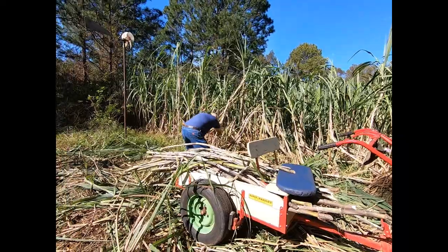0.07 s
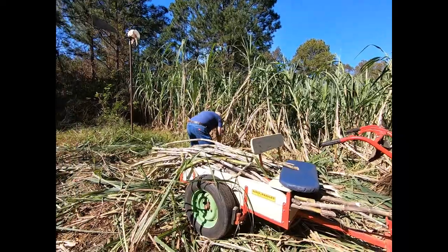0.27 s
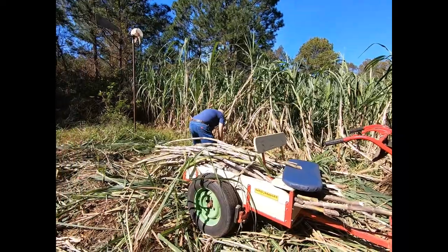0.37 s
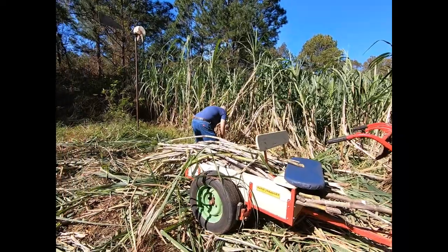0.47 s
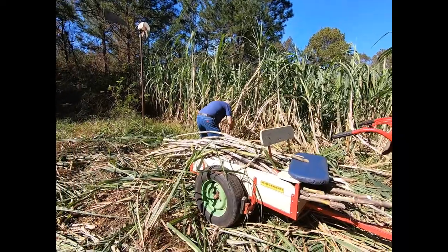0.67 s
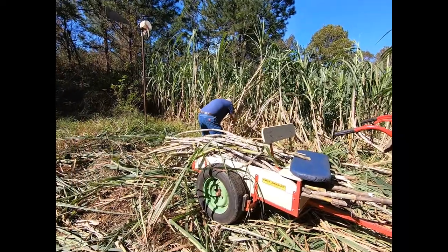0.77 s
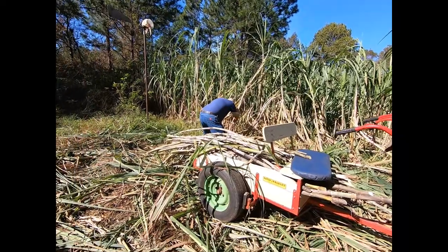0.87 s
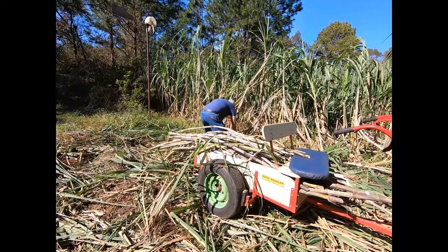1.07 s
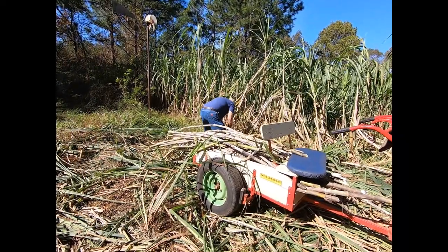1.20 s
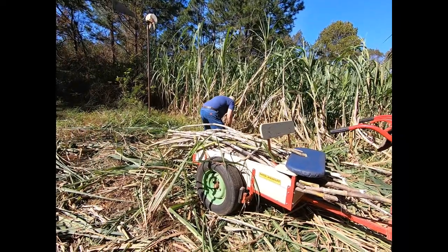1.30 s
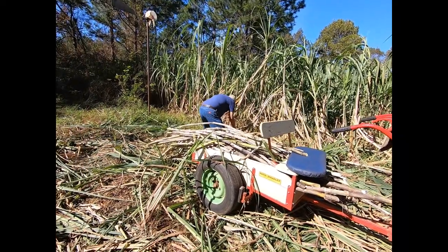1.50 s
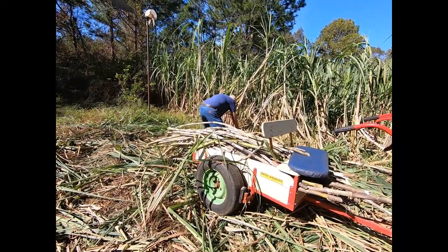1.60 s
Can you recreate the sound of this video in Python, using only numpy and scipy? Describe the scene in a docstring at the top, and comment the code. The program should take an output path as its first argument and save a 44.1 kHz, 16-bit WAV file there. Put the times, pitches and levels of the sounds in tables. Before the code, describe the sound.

Blade chops through fibrous cane stalks twice, crunch and dull thump, amid crackling dry leaves

```python
"""Chopping sugar cane

Two blade chops in an open field: each is a crunch of splitting fibres over a dull thump,
and the shaken foliage hisses on after it. Dry leaves are dragged about on the right, stalks snap,
foliage stirs, and light wind and soft bumps reach the microphone. Crunch, leaves and foliage are
many tiny random cracks; snaps and bites are short noise bursts; the thumps add decaying tones."""
import sys
import numpy as np
from scipy import signal
from scipy.fft import rfft, irfft
from scipy.io import wavfile
from scipy.ndimage import uniform_filter1d

SR = 44100
rng = np.random.default_rng(int(sys.argv[2]) if len(sys.argv) > 2 else 0)


def log_audio(samples):
    """Write samples as a 16-bit WAV file to the path given in sys.argv[1]."""
    # one column per channel
    frames = np.atleast_2d(samples).T
    # limit to full scale, then quantise
    limited = np.clip(frames, -1, 1)
    pcm = np.round(limited * 32767).astype(np.int16)
    wavfile.write(sys.argv[1], SR, pcm)


N = 72765
T = np.arange(N) / SR  # time in s
HZ = np.fft.rfftfreq(2 * N, 1 / SR)  # frequencies for filtering, with room for tails

# the two chops (blade contact t/s, peak t/s, crunch level/dB, rise/s, fall/(dB/s),
# shaken foliage level/dB, crunch tilt/(dB/octave))
CHOPS = [(0.29, 0.3035, -26.5, 0.006, 393, -41.5, 0.9), (1.176, 1.186, -33, 0.005, 403, -46, 1.1)]
# how a sound from each direction reaches the two microphones
# (f/Hz, left minus right/dB, likeness 0-1, left lead/rad)
AHEAD = [(150, -.3, .99, 0), (400, -1.2, .98, 0), (700, -2.5, .92, 0), (1400, -3, .83, .1),
         (2700, -1.2, .9, .05), (4200, .3, .88, -.2), (6200, 0, .62, -.85), (9000, -2, .4, -1.9),
         (15000, -1, .3, -2.5)]
ASIDE = [(150, -.5, .7, 0), (620, -4, .62, -.42), (1400, -8.5, .68, -.25), (2700, -7.3, .7, -.12),
         (4200, -1.2, .53, -.88), (6200, -2.5, .5, -2.8), (9000, -4.8, .33, -3.7), (15000, -2, .2, -4)]
AROUND = [(30, -3, .25, 0), (170, 0, .72, 0), (620, 0, .1, 0), (1400, -1, .15, 0), (2700, -1.5, .68, 0),
          (4200, 0, .68, -.3), (6200, 0, .4, -1.1), (9000, 0, .3, -2.5)]
FLUTTER_DB = 0.5  # how much the leaf and foliage levels waver


def amp(db):
    """Turns decibels into a gain."""
    return 10 ** (np.asarray(db) / 20)


def unit(x):
    """Scales a signal to an rms (average strength) of 1."""
    return x / np.sqrt(np.mean(x ** 2) + 1e-20)


def read(table, column=1):
    """Reads one column of a table at every frequency, joining its points over log frequency."""
    table = np.array(table, float)
    return np.interp(np.log(HZ + 1), np.log(table[:, 0] + 1), table[:, column])


def shape(x, gain):
    """Filters a signal by a gain per frequency."""
    return irfft(rfft(x, 2 * N) * gain)[..., :N]


def place(two, spectrum_db, direction):
    """Colours two unrelated signals and blends them into left and right, as sound from a direction."""
    balance_db = read(direction, 1)
    likeness = np.clip(read(direction, 2), -1, 1)
    lead = read(direction, 3)
    left, other = rfft(two, 2 * N) * amp(spectrum_db)
    right = likeness * left + np.sqrt(1 - likeness ** 2) * other
    right = right * np.exp(-1j * lead)
    pair = np.array([left * amp(balance_db / 2), right * amp(-balance_db / 2)])
    return unit(irfft(pair)[:, :N])


def crackle(per_s, spread_db, wash, patchy_db=1.5):
    """Tiny cracks at random moments over a wash of noise, with patches that favour some pitches."""
    size = amp(spread_db * np.minimum(rng.exponential(1, N), 3))
    size = size * (rng.random(N) < per_s / SR)  # keep only a few samples as cracks
    cracks = unit(size * rng.choice([-1., 1.], (2, N)))
    grains = cracks + wash * rng.standard_normal((2, N))
    # make small random areas of time and pitch louder or softer
    z = signal.stft(grains, nperseg=256, noverlap=192)[2]
    patches = uniform_filter1d(rng.standard_normal(z.shape[1:]), size=2, axis=0)
    patches = unit(uniform_filter1d(patches, size=10, axis=1))
    return signal.istft(z * amp(patchy_db * patches), nperseg=256, noverlap=192)[1][:, :N]


def flutter(hz, depth_db):
    """A gain that wavers at random, no faster than about hz, to clump the cracks."""
    slow = shape(rng.standard_normal(N), 1 / (1 + (HZ / hz) ** 4))
    return amp(depth_db * unit(slow))


def burst(start, t60, rise):
    """An envelope that rises quickly while dying away by 60 dB in every t60 seconds."""
    age = np.maximum(T - start, 0)
    attack = np.minimum(age / max(rise, 1e-5), 1)
    return attack * np.exp(-np.log(1000) * age / t60)


def crack(start, t60, rise, spectrum_db, direction):
    """A short dying burst of coloured noise; its strength is set by the envelope alone."""
    envelope = burst(start, t60, rise)
    noise = place(rng.standard_normal((2, N)), spectrum_db, direction)
    return unit(envelope * noise) * np.sqrt(np.mean(envelope ** 2))


def swells(events):
    """A level with one smooth bell-shaped swell per event (t/s, level/dB, half length/s)."""
    return sum(amp(db) * np.exp(-((T - t) / length) ** 2 / 2) for t, db, length in events)


def field():
    """Faint outdoor hum and far leaf hiss, with soft low noise for wind on the microphone."""
    # colour of the hum and hiss (f/Hz, level/dB)
    air_colour = [(60, -21), (100, -20.5), (168, 0), (215, -6.5), (270, -12.5), (370, -13), (500, -17),
                  (760, -8.5), (1060, -15.5), (1900, -18), (2600, -20), (3600, -18.5), (7400, -22.5),
                  (9700, -22), (11000, -45), (15400, -43)]
    # colour of the wind (f/Hz, level/dB)
    wind_colour = [(10, -7), (32, -5), (50, -9), (110, -27), (300, -50), (1000, -80)]
    # strength of the wind over time (t/s, level/dB)
    wind_db = [(0, -65), (.17, -65), (.35, -54.5), (.5, -78), (.75, -77.5), (1.1, -72), (1.52, -74),
               (1.65, -65)]
    air_db = -63.5
    air = place(crackle(per_s=540, spread_db=2.5, wash=2), read(air_colour), AROUND)
    air = amp(air_db) * air * flutter(hz=25, depth_db=0.64)
    wind = place(rng.standard_normal((2, N)), read(wind_colour), AROUND)
    return air + amp(np.interp(T, *np.transpose(wind_db))) * wind


def bumps():
    """Soft bumps on the hand-held microphone: short swells of low noise."""
    # the bumps (t/s, level/dB, half length/s)
    bump_events = [(0.124, -52, 0.015), (0.277, -51.5, 0.0087), (0.35, -46.5, 0.016), (1.384, -60, .014)]
    # their colour (f/Hz, level/dB)
    bump_colour = [(10, -9), (40, -2), (80, -6), (130, -17), (400, -60)]
    return swells(bump_events) * place(rng.standard_normal((2, N)), read(bump_colour), AROUND)


def stirs():
    """Small stirs of the foliage between the chops: short swells of crackle."""
    # the stirs (t/s, level/dB, half length/s)
    stir_events = [(0.441, -48.5, 0.022), (0.636, -54.5, 0.016), (0.711, -57, 0.026), (0.905, -67, .008)]
    # their colour (f/Hz, level/dB)
    stir_colour = [(200, -10), (1500, -16.5), (3500, 0), (5500, -11.5), (9500, -9.5), (11000, -26),
                   (16000, -27)]
    grains = crackle(per_s=1200, spread_db=-1, wash=0.74)
    return swells(stir_events) * place(grains, read(stir_colour), AHEAD)


def leaves():
    """Dragged dry leaves crackle in clumps; heavier scrapes boost the lower part of the sound."""
    # path of each drag (t/s, level/dB, weight of the lower scrape/dB)
    drags = [
        [(0, -50.5, -1.5), (.04, -46, -1.5), (.062, -42.5, -5.5), (.092, -47.5, -1), (.112, -43, -1),
         (.15, -45.5, 0), (.198, -43, -0.5), (.222, -41.5, 3.5), (.25, -45.5, 7), (.28, -53, -3), (.3, -57, 3)],
        [(1.05, -71, -22), (1.16, -56, 6), (1.235, -51.5, 5), (1.31, -44.5, 2.5), (1.36, -39.5, -7.5),
         (1.39, -40.5, -5.5), (1.44, -37.5, -3), (1.475, -40, -2), (1.49, -45, 4), (1.545, -51, 3.5),
         (1.65, -49.5, -1)],
    ]
    # colour of each drag (f/Hz, level/dB)
    colours = [
        [(90, -34), (160, -10.5), (280, -8.5), (450, -9), (600, -7.5), (780, -3), (1000, -3), (1400, -2.5),
         (2300, -4.5), (3400, -2.1), (4600, -4.5), (6200, -3), (8800, -2), (10000, -7), (11000, -18),
         (14300, -21), (15400, -35)],
        [(90, -35), (160, -11), (280, -8.5), (450, -13), (700, -8), (1000, -4), (1400, -2), (2300, -1),
         (3300, -1.2), (4600, -4.5), (6200, -3), (8800, -2), (10000, -8.5), (11000, -20), (14300, -24.5),
         (15400, -36)],
    ]
    scrape_hz = 2040  # the lower scrape lies below about here
    low_pass = 1 / (1 + (HZ / scrape_hz) ** 4)
    out = np.zeros((2, N))
    for drag, colour in zip(drags, colours):
        t, db, weight_db = np.transpose(drag)
        grains = place(crackle(per_s=1500, spread_db=0.0, wash=0.84), read(colour), ASIDE)
        grains = grains * flutter(hz=120, depth_db=FLUTTER_DB)
        body = shape(grains, low_pass)
        weighted = grains - body + body * amp(np.interp(T, t, weight_db))
        active = (T > t[0] - .03) * (T < t[-1] + .03)
        out += amp(np.interp(T, t, db)) * weighted * active
    return out


def snaps():
    """Stalks and leaf ribs snap as noise bursts with one broad pitch each; leaves add crisp ticks."""
    # snapping stalks and leaf ribs (t/s, level/dB, pitch f/Hz, width/octaves, t60/s)
    snap_events = [(.057, -41, 3320, 0.27, 0.024), (.071, -41, 3470, 0.22, 0.033),
                   (0.1033, -38.5, 3730, 0.42, 0.02), (0.174, -36.5, 2220, 2.5, 0.037),
                   (.218, -36.5, 1400, 0.5, 0.043), (0.258, -44, 1740, 1.6, .012),
                   (0.432, -37.5, 1970, 2.8, 0.026), (.4698, -35, 1370, 0.46, .014),
                   (0.62, -44, 2550, 1.7, 0.036), (0.724, -46.5, 3500, 0.42, 0.019),
                   (0.836, -59, 3320, 0.88, 0.027), (.908, -58, 2080, 0.3, 0.036),
                   (1.161, -35, 2450, 0.22, .011), (1.2317, -42, 1960, 1, 0.0086),
                   (1.2709, -35.5, 3120, 0.27, .015), (1.366, -31, 2340, 1.06, 0.0087),
                   (1.385, -40, 1450, 0.49, 0.019), (1.437, -32, 3240, 0.87, .018),
                   (1.469, -34.5, 3080, 0.79, .025), (1.582, -47, 3280, 1.1, 0.015)]
    # treble loss of the snaps (f/Hz, level/dB)
    dry_edge = [(100, -23), (600, 7.5), (9700, 0), (11200, -6), (16000, -18)]
    # leaf ticks close to the microphone (t/s, level/dB, t60/s)
    tick_events = [(1.0675, -46.5, .006), (1.1514, -27, .004), (1.1612, -38, .007), (1.1688, -41, .009)]
    # their colour (f/Hz, level/dB)
    tick_colour = [(300, -23), (3000, -27), (4500, -4.5), (8500, 4.5), (11000, -7), (16000, -24)]
    skirt_db = -24  # wide, weaker sound around the pitch
    out = np.zeros((2, N))
    for start, db, hz, octaves, t60 in snap_events:
        peak = np.exp(-(np.log2((HZ + 1) / hz) / octaves) ** 2)
        skirt = amp(skirt_db) / np.hypot(1, HZ / (2 * hz))
        colour = 20 * np.log10(peak + skirt) + read(dry_edge)
        # snaps before the first chop or after the second contact come from the dragged side
        dragged = start < CHOPS[0][0] or start > CHOPS[1][0]
        out += amp(db) * crack(start, t60, 0.0005, colour, ASIDE if dragged else AHEAD)
    for start, db, t60 in tick_events:
        out += amp(db) * crack(start, t60, 0.0002, read(tick_colour), ASIDE)
    return out


def thumps():
    """The blow pushes on the stalk, which knocks and rings at its own pitches and shakes the ground."""
    # thump under each chop (t/s, push level/dB, ring f/Hz, ring level/dB, ring t60/s,
    # ground shudder level/dB, shudder t60/s)
    thump_events = [(0.309, -23.5, 166.3, -45.5, 0.41, -37.5, 0.19),
                    (1.1872, -25, 221.6, -27.5, 0.064, -50.5, .11)]
    # colour of the ground shudder (f/Hz, level/dB)
    shudder_colour = [(20, -10), (45, -10), (75, 7), (120, 4.5), (180, 1.5), (350, -9), (750, -22),
                      (1500, -43)]
    # hollow knock of the cut stalk (f/Hz, level relative to the push/dB, t60/s)
    stalk_modes = [(247.3, -16.5, 0.13), (393, -7, 0.041), (560, -14, 0.045), (706, -19.5, 0.066),
                   (2524, -19, 0.13), (2677, -30, 0.27), (3110, -30, 0.11), (3230, -13, 0.088),
                   (3750, -13.5, 0.08), (3860, -25, 0.087), (3950, -15, 0.091), (4580, -21, .12),
                   (4760, -29, 0.13)]
    push_s = 0.00047  # half length of the push
    ring_delay_s, ring_rise_s = 0.0018, 0.0015
    stalk_lead_s = 0.0046  # the knock starts this long before the push peaks
    out = np.zeros((2, N))
    for start, push_db, hz, ring_db, t60, shudder_db, shudder_t60 in thump_events:
        age = T - start
        out -= amp(push_db) * np.exp(-(age / push_s) ** 2)
        ring = np.sin(2 * np.pi * hz * (age - ring_delay_s))
        out += amp(ring_db) * burst(start + ring_delay_s, t60, ring_rise_s) * ring
        shudder = place(rng.standard_normal((2, N)), read(shudder_colour), AHEAD)
        out += amp(shudder_db) * burst(start, shudder_t60, 0.0036) * shudder
        for mode_hz, db, mode_t60 in stalk_modes:
            knock = np.sin(2 * np.pi * (mode_hz * age + rng.random()))  # random phase
            out += amp(db + push_db) * burst(start - stalk_lead_s, mode_t60, 0.0019) * knock
    return out


def chops():
    """The blade bites, fibres split in a dense crunch, and the shaken foliage dies away."""
    # sharp bites of the blade and sharp splitting cracks of the fibres (t/s, level/dB, t60/s)
    bites = [(.2918, -31, 0.026), (0.305, -30.5, 0.023), (0.312, -28.5, 0.016), (1.1836, -32.5, 0.017)]
    # colours of bite, crunch, top end of the crunch, and foliage (f/Hz, level/dB)
    bite_colour = [(100, 3), (500, 0.5), (1500, -5), (3000, -2.5), (5500, -4.5), (9000, -11), (11000, -22),
                   (16000, -33)]
    crunch_colour = [(240, -4.5), (400, -8), (694, -3), (833, -8), (1100, -6.5), (1340, -8), (1630, -4.5),
                     (1760, -8.5), (2870, -5), (3150, -2), (4480, -9), (6770, -9.5), (8250, -14),
                     (9330, -6.5), (15400, -50)]
    treble_shelf = [(9000, 1), (10200, 1), (11000, -2.5), (12500, 7), (14500, 18), (15600, 4)]
    foliage_colour = [(180, -32), (300, -5.5), (366, -2), (446, -8.5), (673, 0), (834, -7.5), (1320, -2.5),
                      (2210, 0.5), (3390, -0.5), (8260, -3.5), (9580, -2), (14200, -31.5), (15400, -24)]
    hold_s = 0.0067  # the crunch stays at its peak this long
    foliage_rise_s, foliage_fall = 0.02, 56  # fall in dB per s
    out = np.zeros((2, N))
    for start, db, t60 in bites:
        out += amp(db) * crack(start, t60, 0.00015, read(bite_colour), AHEAD)
    for contact, peak, db, rise, fall, foliage_db, tilt_db in CHOPS:
        age = T - peak
        growth = (T > contact) * np.exp(np.minimum(age, 0) / rise)
        force = growth * amp(db - fall * np.maximum(age - hold_s, 0))
        tilt = tilt_db * np.log2((HZ + 100) / 3000)
        colour = read(crunch_colour) + read(treble_shelf) + tilt
        out += force * place(crackle(per_s=4000, spread_db=3, wash=0.89), colour, AHEAD)
        sway = np.clip(age / foliage_rise_s, 0, 1)
        sway = sway * amp(foliage_db - foliage_fall * np.maximum(age, 0))
        hiss = place(crackle(per_s=2500, spread_db=2.0, wash=1.0), read(foliage_colour), AHEAD)
        out += sway * hiss * flutter(hz=70, depth_db=FLUTTER_DB)
    return out


def scene():
    """All sources added together in the open air, with no echo."""
    return field() + bumps() + stirs() + leaves() + snaps() + thumps() + chops()


def record(dry):
    """The recorder's band limit: a filter removes the treble above about 15.6 kHz."""
    low_pass = signal.firwin(255, 15600, window=("kaiser", 8), fs=SR)
    return signal.oaconvolve(dry, low_pass[None], "same")


dry = scene()
out = record(dry)
log_audio(out)
```